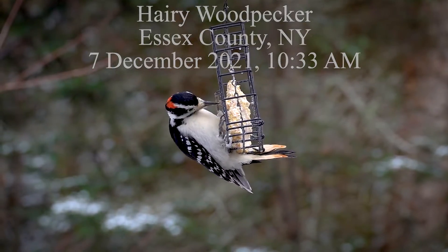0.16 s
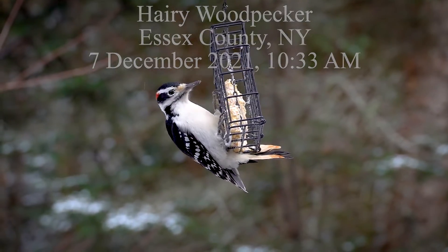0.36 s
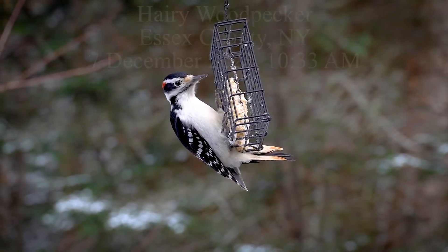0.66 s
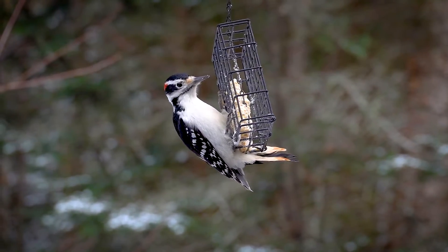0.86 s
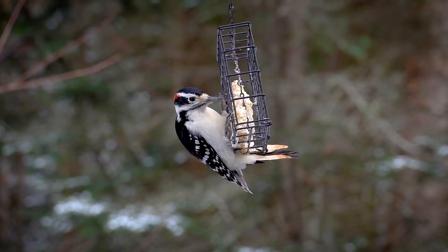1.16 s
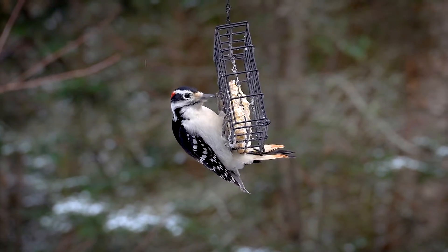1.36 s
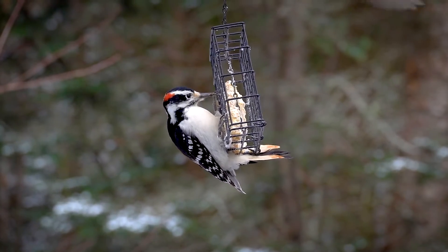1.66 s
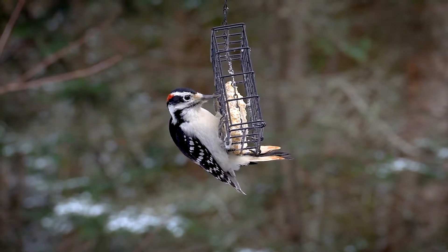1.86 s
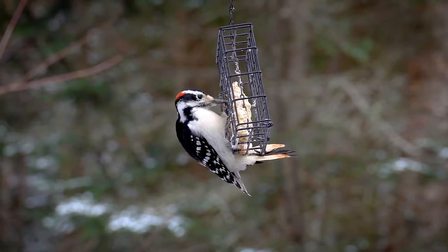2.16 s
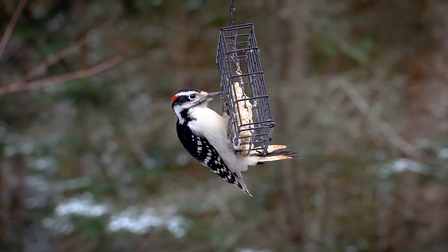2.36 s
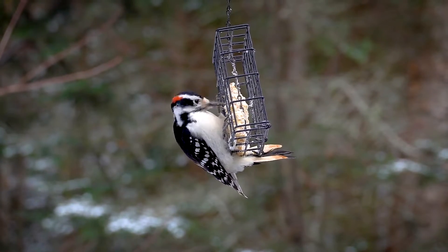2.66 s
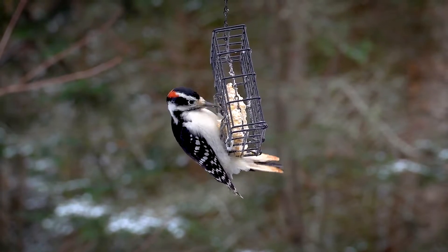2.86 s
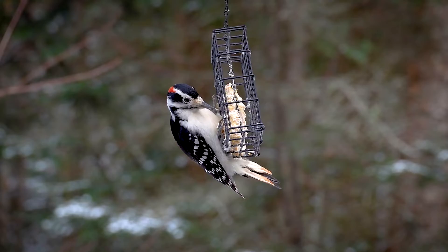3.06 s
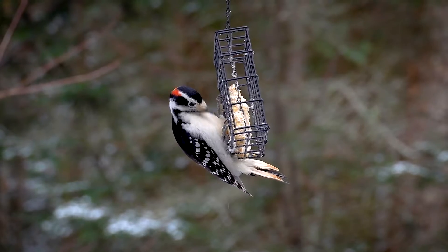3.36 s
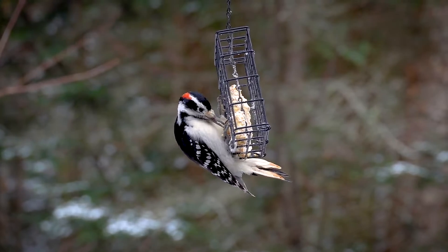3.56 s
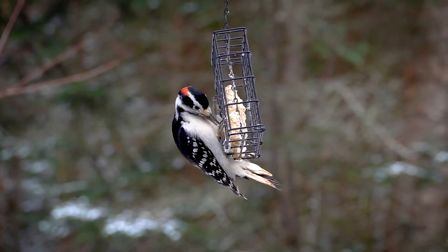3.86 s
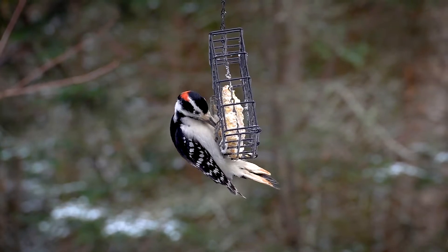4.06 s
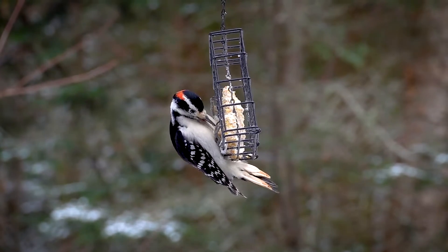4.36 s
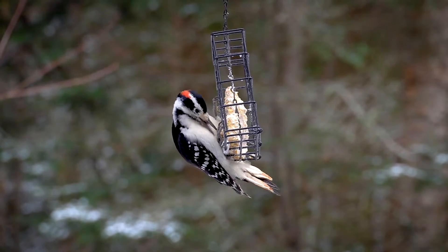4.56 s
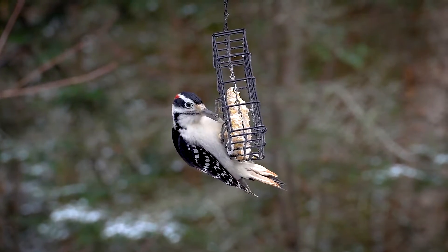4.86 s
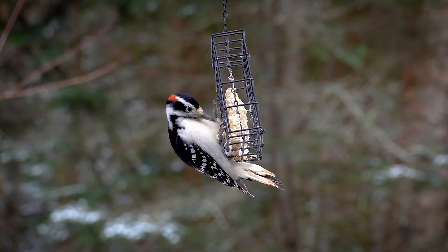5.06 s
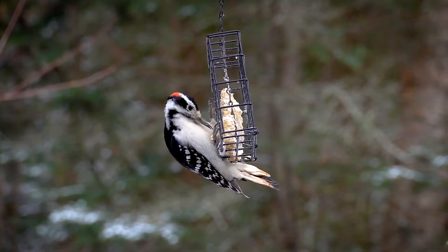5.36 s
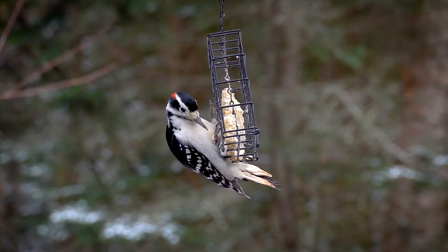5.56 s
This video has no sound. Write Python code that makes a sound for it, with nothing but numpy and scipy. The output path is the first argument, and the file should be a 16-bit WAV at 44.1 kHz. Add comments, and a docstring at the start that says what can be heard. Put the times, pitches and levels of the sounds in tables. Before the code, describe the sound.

A steady wash of distant tyres lies behind a wooded spot heard in stereo. Brief, piercing bird chips, a few of them raspy, come irregularly from the right and peak around the middle. Early on, a woodpecker's bill clicks softly on a wire suet feeder near the centre. Later a faint engine rumbles by far left, followed by another tap, one short whistle on the left and faint peeps, all lightly echoed by the trees.

```python
"""Winter woods by a suet cage, heard from a stereo pair, with a distant road's tyre wash behind.
From the start, small birds to the right give sharp chips, both sides of the syrinx sounding at once;
some end in a harsh rasp. Near 1.5 s a feeding woodpecker begins a few soft bill taps, and farther birds
peep. The chips are loudest near 3 s, a vehicle passes far to the left at 4.1 s, and at 4.8 s, after a
last tap, one bird whistles an answer from the left. The trees scatter calls and taps back throughout."""
import sys
import numpy as np
from scipy import signal
from scipy.fft import rfft, irfft
from scipy.io import wavfile

SR = 44100
rng = np.random.default_rng(int(sys.argv[2]) if len(sys.argv) > 2 else 0)


def log_audio(samples):
    """Write samples as a 16-bit WAV file to the path given in sys.argv[1]."""
    # one column per channel
    frames = np.atleast_2d(samples).T
    # limit to full scale, then quantise
    limited = np.clip(frames, -1, 1)
    pcm = np.round(limited * 32767).astype(np.int16)
    wavfile.write(sys.argv[1], SR, pcm)


N = 251811
TIME = np.arange(N) / SR

# chips to the right: start_s, length_s, top_pitch_hz, level_db, roughness, low_voice_hz, low_voice_db
CHIP_NOTES = [(.102, .032, 6160, -37.3, 1.07, 3435, -47), (.321, .027, 6020, -40, 0.98, 3400, -44),
              (.711, .018, 5300, -39.5, .54, 3430, -47.5), (1.048, .024, 5930, -37.5, 0.7, 3700, -58),
              (1.317, 0.029, 5960, -34.5, .3, 3570, -57), (1.948, .024, 6100, -53.5, .95, 3620, -48.5),
              (2.819, .044, 6220, -29.3, .37, 3700, -58), (3.407, .039, 6320, -28.3, .3, 3690, -50),
              (3.646, .034, 5970, -33.3, 0.54, 3720, -47), (3.797, .042, 6390, -34, 0.83, 3100, -44),
              (4.128, 0.03, 5700, -35.3, 0.82, 3650, -54), (4.393, 0.028, 5870, -32.3, 0.22, 3780, -51),
              (4.583, 0.039, 5610, -37.5, 0.53, 3590, -51), (5.051, .032, 5794, -33, 0.37, 3670, -44)]
# harsh notes to the right: start_s, length_s, rasp_db, low_voice_hz, low_voice_db
HARSH_NOTES = [(.505, 0.051, -36, 2770, -39.5), (2.864, .027, -36, 3030, -44.5),
               (3.796, 0.043, -43, 2930, -46), (4.16, 0.0364, -38.5, 3150, -46.5),
               (5.087, .028, -38.3, 3130, -40.5)]
# rasp spectra of the chips and of the harsh notes: frequency_hz, relative_density_db
CHIP_RASP_SPECTRUM = [(1500, -35), (2600, -26), (3500, 1.5), (4300, -8.5), (5300, 8), (7000, 1),
                      (8400, -6.5), (9900, -2), (11000, -4.5), (12300, -10), (13500, -28), (16000, -34)]
HARSH_RASP_SPECTRUM = [(400, -16), (900, -2.5), (2000, -9.5), (2900, -28), (4200, -3), (5900, 3),
                       (7300, 0.5), (8400, -1), (9700, 5.5), (11000, -9), (12800, -1.5), (14200, -27),
                       (16000, -22)]
# thin squeaks to the right: start_s, length_s, pitch_hz, low_voice_db, upper_voice_db
SQUEAK_NOTES = [(.484, .011, 3440, -43, -41.5), (0.494, 0.0082, 2720, -53, -60),
                (0.704, 0.016, 3430, -44, -43)]
# course of the one whistle from the left: time_s, pitch_hz, level_db
ANSWER_CONTOUR = [(4.779, 6560, -59), (4.786, 4810, -47), (4.793, 6440, -44), (4.799, 6470, -38.5),
                  (4.814, 6620, -34), (4.818, 6360, -40), (4.823, 4470, -51)]
# bill on suet and wire: start_s, level_db
BILL_TAPS = [(1.482, -56), (1.826, -44.5), (1.831, -43.5), (1.864, -56), (4.760, -52)]
# resonances of the wire cage: frequency_hz, relative_level_db, t60_s
CAGE_MODES = [(975, -15, .02), (1900, -2, 0.022), (2940, 2, 0.014), (3860, -0.5, 0.01), (5070, 0, 0.011),
              (6160, -5, 0.0085), (7600, -3, 0.0058)]
# peeps far from the microphones: start_s, length_s, pitch_hz, level_db
FAR_PEEPS = [(1.436, 0.017, 3700, -61.5), (3.493, 0.019, 2210, -61.5), (3.633, 0.014, 2240, -55.5),
             (4.098, 0.023, 2900, -64), (4.873, 0.051, 3760, -55.5)]
# quick slurs, as far off: start_s, first_pitch_hz, last_pitch_hz
FAR_SLURS = [(4.914, 3800, 6300), (4.927, 3800, 5600), (4.937, 6800, 3970)]
# decay of the echo among the trunks: frequency_hz, t60_s
TRUNK_DECAY = [(500, 0.22), (3000, 0.43), (6000, 0.38), (10000, 0.3), (15000, 0.25)]
# tyre noise from the road: frequency_hz, relative_density_db
TYRE_SPECTRUM = [(25, -22.5), (70, -15.5), (105, -18.5), (150, -8), (240, -4.5), (400, -7), (600, -4.5),
                 (900, -6.5), (1220, -6), (1590, -14.5), (2300, -17.5), (3200, -22.5), (6500, -27.5),
                 (15800, -31.5)]
# how alike the road sounds at the two microphones: frequency_hz, correlation
TYRE_CORRELATION = [(60, 0.4), (130, 0.58), (290, -0.0), (640, 0.71), (1410, 0.58), (3100, 0.029),
                    (6820, 0.0), (15000, 0.05)]
# the side the road leans to: frequency_hz, left_minus_right_db
TYRE_LEAN = [(50, -8), (130, 5), (200, 6.5), (380, 2), (700, 3), (1300, 1.5), (2400, 1.5), (4400, 1),
             (15000, 0)]
# exhaust of the passing vehicle: frequency_hz, relative_density_db
EXHAUST_SPECTRUM = [(30, -25), (52, -9), (66, 6), (95, 1), (135, 11.5), (170, 4), (230, -42)]
# engine drones that swell out of the road noise: peak_s, half_length_s, pitch_hz, level_db
ENGINE_DRONES = [(0, 0.23, 305, -61), (0.896, .5, 195, -65.5), (2.45, 0.26, 220, -60), (3.1, 0.3, 309, -58),
                 (3.285, 0.38, 197.5, -52.5), (4.943, 0.73, 310, -55.5), (5.7, 0.29, 201, -53)]


def chips(arch_per_s=4.134, sum_tone_db=-17, clean_rasp_db=-11.5, rough_adds_db=7):
    """Both sides of the syrinx sound at once: an arched whistle over a low voice, with a rasp."""
    out = np.zeros(N)
    rasp = noise(CHIP_RASP_SPECTRUM) * gain_of(3.3 * flutter(N, hz=500).real)
    for start_s, length_s, top_hz, db, rough, low_hz, low_db in CHIP_NOTES:
        air, u = breath(length_s, rise=0.44, fall=0.37)
        quaver = 0.018 * flutter(len(u), hz=170).real
        high_track = top_hz * (1 - arch_per_s * length_s * u ** 2 + quaver)  # longer chips arch further
        low_track = low_hz * (1.015 + 0.022 * u - 0.073 * u ** 2)
        high = voice(high_track, rough, flutter_hz=724)
        # the two sides share one airstream, so their sum tone sounds too
        high += gain_of(sum_tone_db) * voice(high_track + low_track, rough=0.79, flutter_hz=380)
        high += gain_of(clean_rasp_db + rough_adds_db * rough) * rasp[round(start_s * SR):][:len(u)]
        low = voice(low_track, rough=0.33, flutter_hz=292) * unit_rms(np.exp(-0.9 * u))
        add(out, start_s, air * (gain_of(db) * high + gain_of(low_db) * low))
    return out


def harsh_notes():
    """The syrinx driven into chaos: a wide, uneven rasp over a rough low voice that sags."""
    out = np.zeros(N)
    rasp = noise(HARSH_RASP_SPECTRUM) * gain_of(3.8 * flutter(N, hz=400).real)
    for start_s, length_s, rasp_db, low_hz, low_db in HARSH_NOTES:
        air, u = breath(length_s, rise=0.25, fall=0.4)
        low = voice(low_hz * (1 - 0.039 * u), rough=0.93, flutter_hz=290)
        burst = rasp[round(start_s * SR):][:len(u)]
        add(out, start_s, air * (gain_of(rasp_db) * burst + gain_of(low_db) * low))
    return out


def squeaks(upper_ratio=1.95, arch=0.053):
    """Two thin voices arch together, about an octave apart."""
    out = np.zeros(N)
    for start_s, length_s, hz, low_db, upper_db in SQUEAK_NOTES:
        air, u = breath(length_s, rise=0.4, fall=0.61)
        track = hz * (1 - arch * u ** 2)
        low = voice(track, rough=0.48, flutter_hz=290)
        upper = voice(upper_ratio * track, rough=0.3, flutter_hz=740)
        add(out, start_s, air * (gain_of(low_db) * low + gain_of(upper_db) * upper))
    return out


def answer():
    """A clean whistle that dips, arches and drops."""
    out = np.zeros(N)
    time_s, hz, db = np.transpose(ANSWER_CONTOUR)
    t = np.arange(time_s[0], time_s[-1], 1 / SR)
    whistle = voice(np.interp(t, time_s, hz), rough=0.066, flutter_hz=400)
    add(out, time_s[0], gain_of(np.interp(t, time_s, db)) * whistle)
    return out


def woodpecker_taps(crunch_s=0.0025):
    """The bill cracks into frozen suet; the fat damps the wire cage at once."""
    out = np.zeros(N)
    t = np.arange(SR // 20) / SR
    ring = sum(gain_of(db - 60 * t / t60) * np.sin(2 * np.pi * hz * t) for hz, db, t60 in CAGE_MODES)
    ring /= np.linalg.norm(ring)
    for start_s, db in BILL_TAPS:
        crunch = rng.standard_normal(len(t)) * np.exp(-t / crunch_s)
        cage = signal.fftconvolve(crunch, ring)[:len(t)]
        add(out, start_s, gain_of(db) * (cage + 0.4 * crunch))
    return out


def far_birds(slur_s=0.0072, slur_db=-58.5):
    """Short, husky peeps and quick slurs from deeper in the woods."""
    out = np.zeros(N)
    for start_s, length_s, hz, db in FAR_PEEPS:
        air, u = breath(length_s, rise=0.94, fall=0.083)
        peep = voice(np.full(len(u), hz), rough=0.35, flutter_hz=150)
        add(out, start_s, gain_of(db) * air * peep)
    for start_s, first_hz, last_hz in FAR_SLURS:
        air, u = breath(slur_s, rise=0.28, fall=0.39)
        slur = voice(np.linspace(first_hz, last_hz, len(u)), rough=0.9, flutter_hz=400)
        add(out, start_s, gain_of(slur_db) * air * slur)
    return out


def tree_echoes(sound, near_db, far_db, near_t60_s=0.056, echoes_per_s=3000):
    """Surfaces near the microphones scatter a quick smear; trunks farther off give a thin, long tail."""
    reflections = rng.standard_normal((2, SR)) * (rng.random((2, SR)) < echoes_per_s / SR)
    reflections[:, :SR // 400] = 0  # a gap before the first echo
    hz, t, spectrogram = signal.stft(reflections, SR, nperseg=256)
    response = 0
    for db, t60 in ((near_db, near_t60_s), (far_db, curve_at(TRUNK_DECAY, hz)[:, None])):
        tail = signal.istft(spectrogram * gain_of(-60 * t / t60), SR, nperseg=256)[1]
        response += gain_of(db) * tail / np.linalg.norm(tail, axis=1, keepdims=True)
    return signal.fftconvolve(sound[None], response, axes=1)[:, :N]


def tyre_wash(level_db=-50.5, rise_db_per_s=0.33):
    """Tyre noise from the distant road, slowly growing, thinning to a fine hiss in the treble."""
    hz = np.fft.rfftfreq(N, 1 / SR)
    shared, separate = rfft(noise(TYRE_SPECTRUM)), rfft(noise(TYRE_SPECTRUM))
    alike, lean_db = curve_at(TYRE_CORRELATION, hz), curve_at(TYRE_LEAN, hz)
    left = shared * gain_of(lean_db / 2)
    right = (alike * shared + np.sqrt(1 - alike ** 2) * separate) * gain_of(-lean_db / 2)
    pair = irfft(np.array([left, right]), N)
    return pair / pair.mean(0).std() * gain_of(level_db + rise_db_per_s * (TIME - TIME.mean()))


def engines(nearest_s=4.11, distance_over_speed_s=0.64, rumble_db=-58, blur=0.1):
    """Exhaust rumble that follows a passing vehicle's distance, and blurred drones that swell and fade."""
    relative_distance = np.hypot(1, (TIME - nearest_s) / distance_over_speed_s)
    out = gain_of(rumble_db) * noise(EXHAUST_SPECTRUM) / relative_distance
    for peak_s, half_length_s, hz, db in ENGINE_DRONES:
        swell = np.exp(-((TIME - peak_s) / half_length_s) ** 2 / 2)
        band = signal.butter(2, [hz * (1 - blur), hz * (1 + blur)], "bandpass", fs=SR, output="sos")
        out += gain_of(db) * swell * unit_rms(signal.sosfilt(band, rng.standard_normal(N)))
    return out


def traffic():
    """The engines lie far to the left; the right microphone gets mostly scattered sound."""
    direct, scattered = engines(), engines()
    return np.array([1.71 * direct, 0.16 * direct + 0.38 * scattered])


def breath(length_s, rise, fall):
    """Air pressure over a note (rise and fall are shares of it), and the position u in it, -1 to 1."""
    progress = np.linspace(0, 1, max(int(length_s * SR), 64))
    onset = np.sin(np.pi / 2 * np.minimum(progress / rise, 1))
    release = np.sin(np.pi / 2 * np.minimum((1 - progress) / fall, 1))
    u = 2 * progress - 1
    return unit_rms(onset * release * gain_of(-5.5 * u ** 2)), u


def voice(track_hz, rough, flutter_hz):
    """One side of a syrinx: a tone that breaks up into fast irregular flutter as rough nears 1."""
    rough = np.clip(rough, 0, 1)
    wobble = np.sqrt(1 - rough ** 2) + rough * flutter(len(track_hz), flutter_hz)
    phase = 2 * np.pi * np.cumsum(track_hz) / SR
    return unit_rms((wobble * np.exp(1j * phase)).real)


def flutter(size, hz):
    """Complex random wobble with rates up to about hz."""
    white = rng.standard_normal(size) + 1j * rng.standard_normal(size)
    rolloff = np.sqrt(1 + (np.fft.fftfreq(size, 1 / SR) / hz) ** 4)
    return unit_rms(np.fft.ifft(np.fft.fft(white) / rolloff))


def noise(spectrum):
    """Noise of a given spectrum, rms 1."""
    colour = gain_of(curve_at(spectrum, np.fft.rfftfreq(N, 1 / SR)))
    return unit_rms(irfft(rfft(rng.standard_normal(N)) * colour, N))


def place(sound, lean_db, lag_ms):
    """A bearing at the microphones: left minus right level, and the delay of the left side."""
    delay = np.exp(-2j * np.pi * np.fft.rfftfreq(N, 1 / SR) * lag_ms / 1000)
    left, right = unit_rms(gain_of([lean_db / 2, -lean_db / 2]))
    return np.array([left * irfft(rfft(sound) * delay, N), right * sound])


def gain_of(db):
    """Decibels to a factor."""
    return 10 ** (np.asarray(db) / 20)


def unit_rms(x):
    """Scales to an rms of 1."""
    return x / np.sqrt(np.mean(abs(x) ** 2) + 1e-20)


def curve_at(table, hz):
    """Reads a table on a log-frequency axis."""
    table_hz, values = np.transpose(table)
    return np.interp(np.log(hz + 1), np.log(table_hz + 1), values)


def add(mix, start_s, sound):
    """Mixes a sound in at start_s."""
    part = mix[max(round(start_s * SR), 0):][:len(sound)]
    part += sound[:len(part)]


def scene():
    """From the microphones: birds on both sides, the feeder a little right of centre, the road behind."""
    right_birds = chips() + squeaks() + harsh_notes()
    left_bird, far, bill = answer(), far_birds(), woodpecker_taps()
    direct = place(right_birds, lean_db=-9, lag_ms=0.072) + place(left_bird, lean_db=13, lag_ms=-0.049)
    direct += place(far, lean_db=0, lag_ms=0.024) + place(bill, lean_db=-4, lag_ms=0)
    echoes = tree_echoes(right_birds + bill, near_db=-10, far_db=-16.5) * gain_of([[-0.6], [0.6]])
    echoes += tree_echoes(left_bird + far, near_db=-15, far_db=-10)  # farther birds have more tail
    return direct + echoes + tyre_wash() + traffic()


def record(dry):
    """The recorder's band limit."""
    lowpass = signal.firwin(511, cutoff=15950, window=("kaiser", 9), fs=SR)
    return signal.oaconvolve(dry, lowpass[None], "same")


dry = scene()
out = record(dry)
log_audio(out)
```